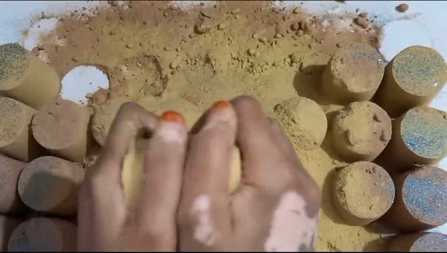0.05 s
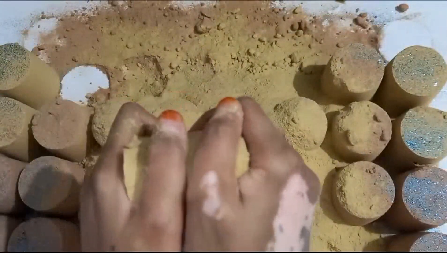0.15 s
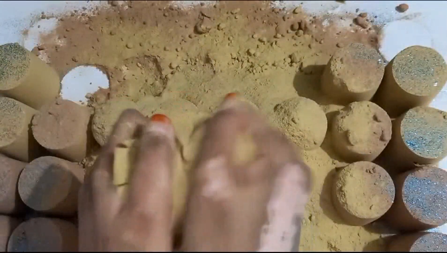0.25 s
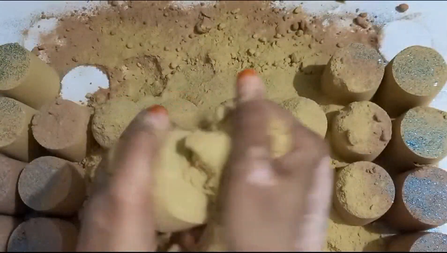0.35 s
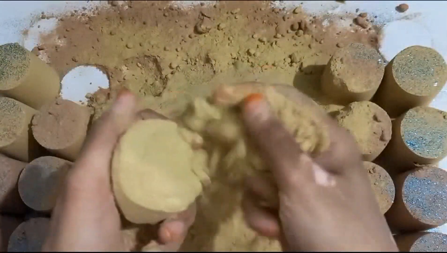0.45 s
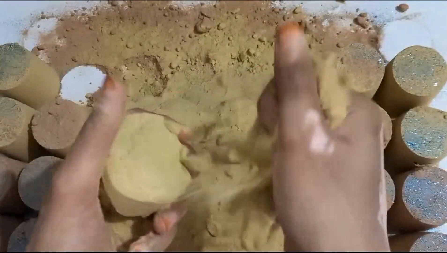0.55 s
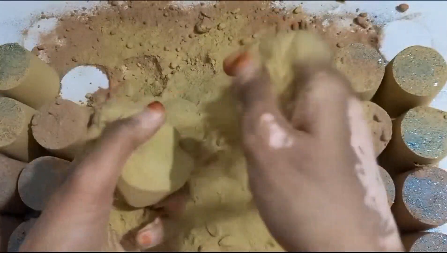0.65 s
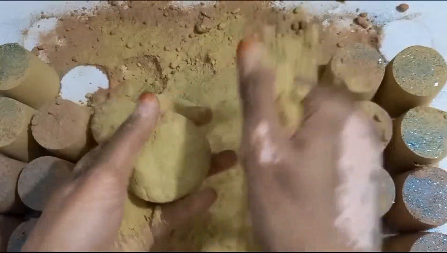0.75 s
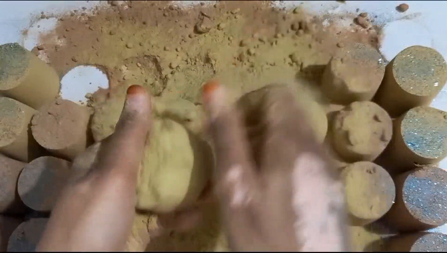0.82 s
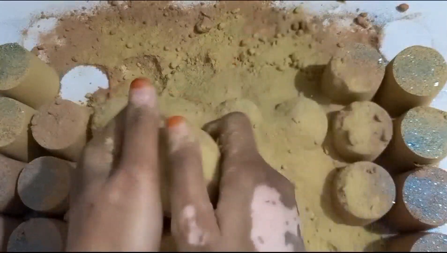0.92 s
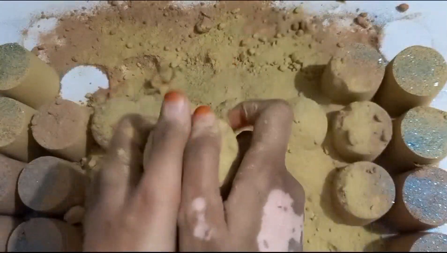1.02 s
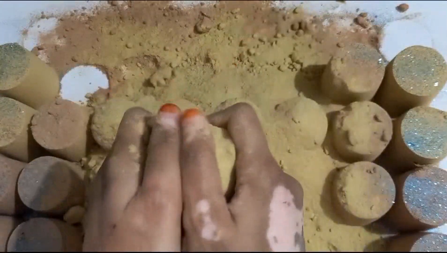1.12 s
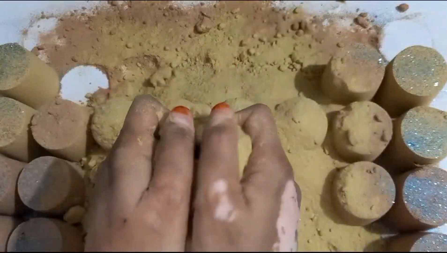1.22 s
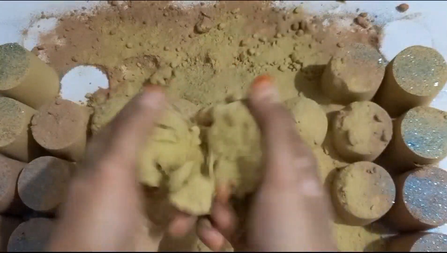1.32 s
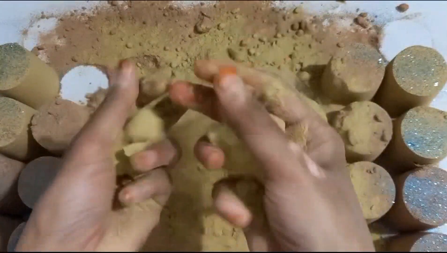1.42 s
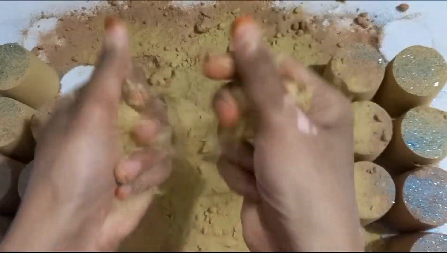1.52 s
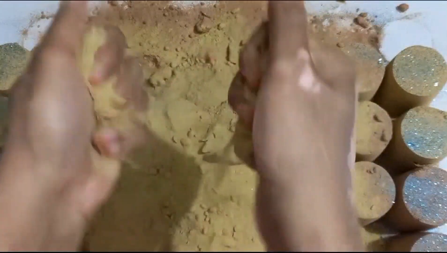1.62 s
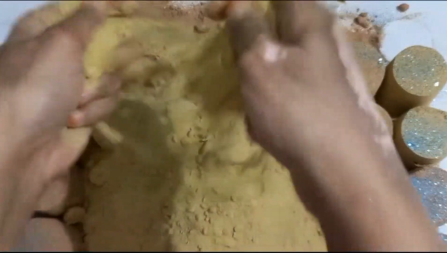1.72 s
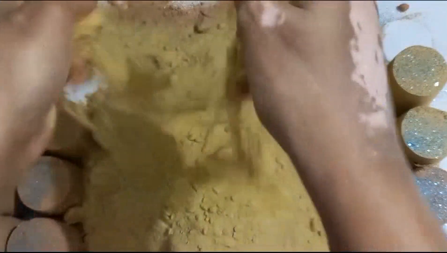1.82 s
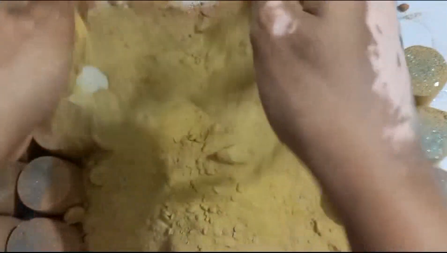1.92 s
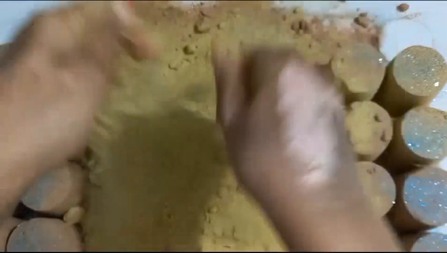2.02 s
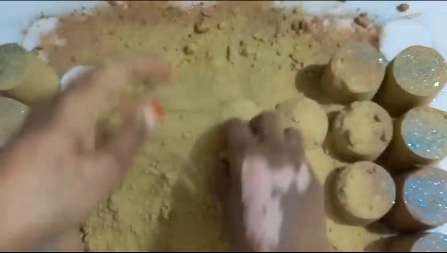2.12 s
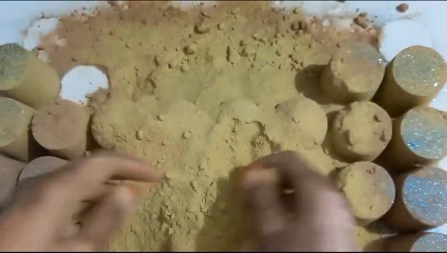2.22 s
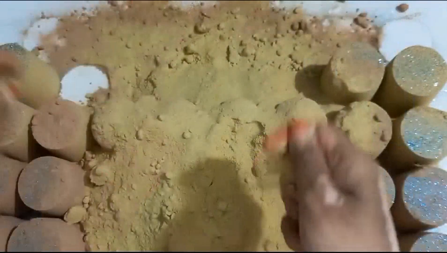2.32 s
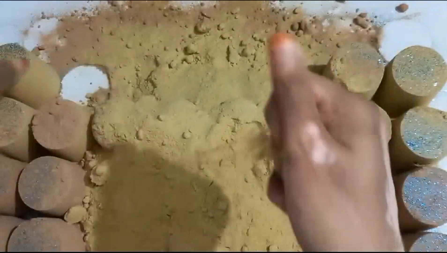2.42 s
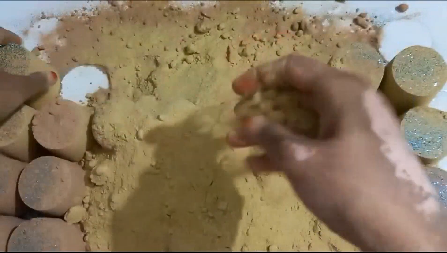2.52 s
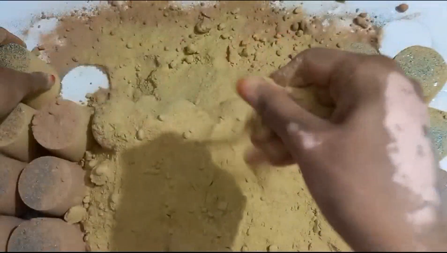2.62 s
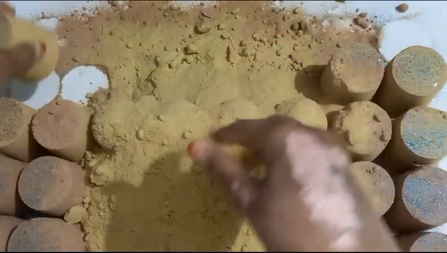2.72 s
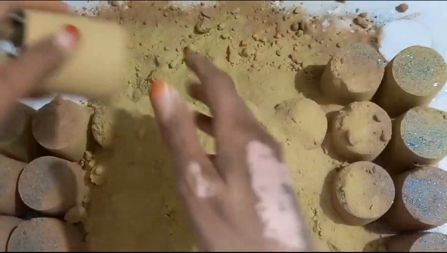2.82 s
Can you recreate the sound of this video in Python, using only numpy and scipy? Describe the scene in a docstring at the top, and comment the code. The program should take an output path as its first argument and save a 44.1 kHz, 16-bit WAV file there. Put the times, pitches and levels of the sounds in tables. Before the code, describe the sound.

Powder blocks crushed and crumbled by two hands, gritty crunching bursts with sharp crackles, close and dry

```python
"""A fine hiss of grains comes first: two hands close by squeeze and break pressed powder blocks.
Grains are clumped random impulses through band colours; low crumbs crunch and hard chips ring.
Blocks give way with dull thuds (damped modes) and short cracks (decaying noise); lumps scrape (narrow noise).
Handling rumbles softly below (low sine bumps and noise), with faint short tones, over a quiet room's noise."""
import sys
import numpy as np
from scipy import signal
from scipy.fft import rfft, irfft, next_fast_len
from scipy.io import wavfile
from scipy.ndimage import uniform_filter1d, map_coordinates

SR = 44100
rng = np.random.default_rng(int(sys.argv[2]) if len(sys.argv) > 2 else 0)


def inscribe(sig):
    """Save sig as 16-bit PCM at rate SR to the path in sys.argv[1].

    A 1-D sig is mono; a 2-D sig holds one channel per row.
    Samples are clipped to [-1, 1] before scaling.
    """
    pcm = np.round(np.clip(np.atleast_2d(sig).T, -1, 1) * 32767)
    wavfile.write(sys.argv[1], SR, pcm.astype(np.int16))


N = 127890
T = np.arange(N) / SR  # time [s]


def amp(db):
    """Decibel law: a level in dB as an amplitude ratio."""
    return 10 ** (np.asarray(db) / 20)


def unit(x):
    """Normalisation: x scaled to rms 1."""
    return x / np.sqrt(np.mean(x ** 2) + 1e-20)


def curves(rows):
    """Linear interpolation: one value per sample for each column after the time."""
    times, *columns = np.transpose(rows)
    return [np.interp(T, times, column) for column in columns]


def filtered(x, response):
    """Linear filtering: the spectrum of x times a response of frequency in Hz."""
    padded = next_fast_len(x.shape[-1] + 8192)
    spectrum = rfft(x, padded) * response(np.fft.rfftfreq(padded, 1 / SR))
    return irfft(spectrum, padded)[..., :x.shape[-1]]


def coloured(x, spectrum):
    """Spectral shaping: x through (frequency [Hz], level [dB]) points joined in log frequency, at rms 1."""
    points_hz, points_db = np.transpose(spectrum)

    def response(hz):
        return amp(np.interp(np.log(hz + 1), np.log(points_hz + 1), points_db, -120, -120))
    return unit(filtered(x, response))


def sides(pan_db):
    """Level panning: left and right gains that differ by pan_db."""
    return amp(np.array([pan_db / 2, -pan_db / 2]))


def wobble(rate):
    """Smooth random modulation: a spline through normal draws, rate knots a second."""
    return map_coordinates(rng.standard_normal(N // 20), [T * rate])


def pair(alike):
    """Partial coherence: two white noises with correlation alike."""
    a, b = rng.standard_normal((2, N))
    angle = np.arccos(np.clip(alike, -1, 1)) / 2
    shared, opposed = np.cos(angle) * a, np.sin(angle) * b
    return np.array([shared + opposed, shared - opposed])


def patchy(x, depth_db):
    """Time-frequency modulation: random patches of gain, the same on both sides, at rms 1."""
    frames = signal.stft(x, nperseg=512)[2]
    field = rng.standard_normal(frames.shape[1:])
    field = uniform_filter1d(field, size=2, axis=0)  # smooth over frequency
    field = uniform_filter1d(field, size=4, axis=1)  # smooth over time
    return unit(signal.istft(frames * amp(depth_db * unit(field)), nperseg=512)[1][:, :N])


def around(centre_hz, octaves, wide, count):
    """Band-limited noise: a stereo peak at a centre, plus a flat floor of gain wide, at rms 1."""
    def response(hz):
        peak = 1 / (1 + (np.log2((hz + 1) / centre_hz) / octaves) ** 4)
        return wide * (hz > 700) * (hz < 7300) + peak
    return unit(filtered(pair(0.47)[:, :count], response))


def add_at(out, start_s, sound):
    """Superposition: sound added into out from start_s on."""
    out[:, round(start_s * SR):][:, :sound.shape[1]] += sound


def grains(per_s, life_s, bed, clump_db, alike):
    """Shot noise: decaying impulses of scattered size gate noise, in clumps, on an even bed."""
    SIZE_DB = 1.5  # mean of the exponential spread of size in dB
    draw = rng.random((2, N))
    impulses = (draw[0] < per_s / SR) * amp(-SIZE_DB * np.log(draw[1] + 1e-4))
    bursts = signal.lfilter([1], [1, -np.exp(-1 / (life_s * SR))], impulses)
    return (unit(bursts) + bed) * amp(clump_db * wobble(60)) * pair(alike)


def chips():
    """Damped oscillation: hard little chips snap off and ring, each at its own pitch and place."""
    SLOTS_PER_S, CHIP_PER_S = 400, 380  # possible and mean actual chips a second
    CHIP_HZ, CHIP_OCTAVES = 2300, 0.5  # middle pitch and its standard deviation
    CHIP_CYCLES, CHIP_SIZE_DB = 9, 2.5  # decay by a factor e; mean of the exponential size spread
    t = T[:SR // 25]
    draw = rng.random((int(N / SR * SLOTS_PER_S), 6))
    spread = np.sqrt(12) * (draw[:, 1:2] + draw[:, 2:3] - 1) / np.sqrt(2)  # standard deviation 1
    hz = np.clip(CHIP_HZ * 2 ** (CHIP_OCTAVES * spread), 300, 6900)
    size = (draw[:, 3:4] < CHIP_PER_S / SLOTS_PER_S) * amp(-CHIP_SIZE_DB * np.log(draw[:, 4:5] + 1e-3))
    envelope = np.exp(-t * hz / CHIP_CYCLES) * (1 - np.exp(-t * hz / 2))
    ring = size * np.sin(2 * np.pi * hz * t) * envelope
    at = (draw[:, :1] * N).astype(int) + np.arange(len(t))
    angle = draw[:, 5:] * np.pi / 2  # equal-power place from left to right
    left, right = [np.bincount(at.ravel(), (ring * gain(angle)).ravel(), N)[:N] for gain in (np.cos, np.sin)]
    return unit(np.array([left, right]))


def powder():
    """Granular emission: grain noise swells and fades in several bands, from low crumbs to a thin top hiss."""
    # Level curve points: (time [s], fine grain level [dB], then over it crumbs [dB], grit [dB],
    # 8-14 kHz hiss [dB], top hiss [dB]; left minus right of all but the crumbs [dB])
    level_points = [(0.0, -48.5, -19.5, -9.5, -39, -16, 5), (0.07, -76.5, -13, -10, -23, -9, 1),
                    (0.12, -43, -9.5, -13, -34, -22.5, 1.5), (0.17, -51.5, -11, 1, -31, -21, 1),
                    (0.22, -60, -8, -7.5, -30, -12, 8), (0.25, -31.5, 3.5, 4, -15.5, -12, 0),
                    (0.28, -52.5, 5, -1.5, -22, -5, 4.5), (0.34, -52, -3.5, -4, -39, -19, 5.5),
                    (0.35, -56, 7.5, 3, -36, -18, -3), (0.41, -73, -2, -6, -20, 0, 4.5),
                    (0.45, -52.5, -2.5, -5, -32, -19, 1.5), (0.52, -37.5, -2, -9, -18.5, -12.5, 7),
                    (0.56, -43, -7.5, -4.5, -21, -4.5, 4), (0.6, -50, -3, -3.5, -29, -17, 0),
                    (0.63, -46, -15, -6, -32, -13, 1), (0.65, -49, -11, -5, -30, -16, 4),
                    (0.7, -37, -10, -7, -12.5, -13, -1), (0.77, -53.5, -6.5, -2.5, -26, -10, 5),
                    (0.8, -41.5, -15.5, -6.5, -36, -28, 2), (0.82, -49.5, 2, 1, -30, -18, 0),
                    (0.86, -54.5, -13.5, -13, -24, -19, 2), (0.9, -47, -13, 0.5, -24, -16, 3.5),
                    (0.97, -60.5, -14.5, -15.5, -33, -18.5, 5.5), (1.15, -72, -7.5, -9, -24, -3, 6.0),
                    (1.19, -45, -0.5, -1, -19, -17.5, 1), (1.25, -57, 1, -1, -37, -15.5, 3.5),
                    (1.34, -52, -22, -11, -31, -12.5, 5.5), (1.38, -68, -18, -7, -25, -16, 3),
                    (1.4, -53.5, -16, -9.5, -26, -12, 1), (1.478, -37.5, -5, 0, -18.5, -14, -2.5),
                    (1.49, -34, -6, 4, -29, -13, 4), (1.5, -41.5, 0.5, -4, -16, -13, 5),
                    (1.53, -35.5, 5.5, 0.5, -20, -4.5, 0.5), (1.57, -35.5, -9, -5, -21, -8, 3.5),
                    (1.62, -42.5, -1.5, 0, -18, -21, 3.5), (1.655, -47.5, -6, -6, -34, -13, -0.5),
                    (1.68, -57, -8.5, -9, -26, -9, 1), (1.715, -51.5, -5, 3, -30, -10, 1.5),
                    (1.74, -38, -11, -7.5, -15, -15, 3), (1.78, -38.5, -5, -5.5, -6, -4, 0),
                    (1.84, -49.5, -4.5, -6.5, -34, -14, 1), (1.93, -34.5, -10, -8, -12.5, -10.5, 2),
                    (2.0, -52, -6, -4, -18.5, -5, 3), (2.04, -43, -9.5, -11.5, -22, -7, 2.5),
                    (2.075, -73, 8, -2, -10, -2, 2), (2.12, -67.5, -3, -10, -28, -7, 5),
                    (2.22, -75.5, 11, 4, -16, -3, -1), (2.25, -51, -23, -46, -36, -16.5, 9),
                    (2.28, -63, 7.5, 5, -20, -15, -2), (2.3, -41.5, -4.5, -7.5, -26.5, -14, 1),
                    (2.41, -45, -10.5, -9, -18, -11.5, 5.5), (2.45, -60.5, -17, 0, -35, -11, 6.5),
                    (2.49, -78.5, -5, -8, -13, -4, -2.5), (2.54, -47, -27, -12, -35, -22.5, 3),
                    (2.58, -37.5, -22, -11.5, -20, -20, 3), (2.62, -37, -23, -9, -23.5, -12, 1.5),
                    (2.74, -79, -7, -6.5, -18, -7, 1), (2.85, -54, -18, -19, -37, -16, 3.5),
                    (2.87, -61, -17.5, -10.5, -34, -10, 5.5), (2.89, -46, -30, -14, -41, -20, 8),
                    (2.9, -44.5, -24, -7, -36, -21, 8)]
    # Spectra of each band: (frequency [Hz], density [dB per Hz])
    fine_colour = [(3600, -16.5), (4400, -10.5), (5200, -5), (6400, 0), (6900, -5), (7200, -13),
                   (8300, -32), (9000, -74)]
    grit_colour = [(2100, -49), (2700, -3), (4300, -1.5), (5200, -21)]
    high_hiss_colour = [(7400, -13), (8400, -10), (9400, -3), (13500, -6), (14500, -27)]
    top_colour = [(13400, -18), (14500, -5.5), (15100, 8), (15900, -8), (16300, -19)]
    crumb_colour = [(200, -15), (350, -4), (700, -8), (950, -2.5), (1190, 2), (1650, -5), (2100, 2),
                    (2600, -2.5), (3200, -46)]
    FINE_PER_S, CRUMB_PER_S = 5000, 3400  # grains a second
    CHIP_DB, CRUMB_PAN_DB = -8, 1  # chips over the crumbs; left minus right of both

    level_db, crumb_db, grit_db, high_hiss_db, top_db, pan_db = curves(level_points)
    mid_grains = grains(FINE_PER_S, life_s=0.00046, bed=1.1, clump_db=2.5, alike=0.44)
    high_grains = grains(FINE_PER_S, life_s=0.00044, bed=1.4, clump_db=0.5, alike=0.6)
    low_grains = grains(CRUMB_PER_S, life_s=0.0013, bed=4.1, clump_db=1.5, alike=0.22)

    upper = patchy(coloured(mid_grains, fine_colour), depth_db=3.5)
    upper += amp(grit_db) * patchy(coloured(mid_grains, grit_colour), depth_db=1.5)
    upper += amp(high_hiss_db) * patchy(coloured(high_grains, high_hiss_colour), depth_db=6.5)
    upper += amp(top_db) * patchy(coloured(high_grains, top_colour), depth_db=4.5)
    crumbs = patchy(coloured(low_grains, crumb_colour), depth_db=5.5)
    lower = (crumbs + amp(CHIP_DB) * chips()) * sides(CRUMB_PAN_DB)[:, None]
    return amp(level_db) * (upper * sides(pan_db) + amp(crumb_db) * lower)


def thuds():
    """Modal synthesis: a block gives way and rings low damped modes whose pitch sags at the start."""
    # Blocks giving way: (time [s], level before THUD_DB [dB], strongest pitch [Hz], left minus right [dB])
    breaks = [(0.2434, -10.5, 220, 0.5), (0.265, -29, 332, -1), (0.2541, -37.5, 324, -34),
              (0.35, -33, 372, -7.5), (0.521, -37.5, 221, 4.5), (0.611, -52, 180, 22),
              (0.821, -33, 324, -5.5), (1.1781, -16, 255, 0), (1.182, -34, 810, -5), (1.209, -33, 290, 6),
              (1.1865, -21, 348, 7), (1.271, -50, 330, 2), (1.5159, -26.5, 503, -15), (1.521, -22, 530, 2),
              (1.525, -31.5, 188, -6), (1.544, -49, 202, 3.5), (1.783, -48, 376, -15), (2.057, -38, 124, 7),
              (2.082, -46, 330, 1), (2.301, -48.5, 412, 18.5)]
    # Modes of a block: (frequency once settled [Hz], level at the strongest pitch [dB], 60 dB decay [s])
    modes = [(90.4, -24, 0.16), (105.3, -5, 0.11), (164.6, 14.5, 0.032), (226, 14.5, 0.022),
             (268.4, -11.5, 0.054), (315.7, 5.5, 0.036), (527, 6.5, 0.019), (610, 4.5, 0.03),
             (863, -21, 0.1)]
    OFF_PITCH_DB = 9.5  # loss per octave from the strongest pitch
    THUD_DB, THUD_RISE_S = 4, 0.0046
    SAG, SAG_S = 0.39, 0.0045  # the modes start this share sharp and settle with this time constant
    out, t = np.zeros((2, N + SR)), T[:SR // 4]
    bent = t + SAG * SAG_S * (1 - np.exp(-t / SAG_S))  # warped time bends every mode alike
    rise = (1 - np.exp(-t / THUD_RISE_S)) ** 2
    for start_s, db, pitch_hz, pan_db in breaks:
        ring = np.zeros(len(t))
        for hz, mode_db, t60 in modes:
            decay_db = mode_db - OFF_PITCH_DB * abs(np.log2(hz / pitch_hz)) - 60 * t / t60
            ring += amp(decay_db) * np.sin(2 * np.pi * hz * bent)
        # each mode swings negative first
        add_at(out, start_s, -sides(pan_db)[:, None] * amp(db + THUD_DB) * ring * rise)
    return out[:, :N]


def cracks():
    """Fracture noise: short, exponentially decaying bursts around a centre as lumps split."""
    # Splits: (time [s], level before CRACK_DB [dB], centre [Hz])
    splits = [(0.115, -24, 2470), (0.138, -22, 3280), (0.242, -17, 2300), (0.247, -16.5, 840),
              (0.481, -18.5, 2240), (0.522, -18, 3960), (0.824, -28, 1380), (1.177, -20, 750),
              (1.205, -27.5, 3020), (1.483, -10.5, 2030), (1.523, -9.5, 1230), (2.037, -28, 2570),
              (2.293, -16.5, 2150), (2.301, -17.5, 2070), (2.38, -19.5, 4400)]
    CRACK_OCTAVES, CRACK_WIDE = 0.39, 0.14  # half width at half gain; gain of the flat floor
    CRACK_RISE_S, CRACK_T60_S = 0.0008, 0.066
    CRACK_DB, CRACK_PAN_DB = -18, 1.5
    out, t = np.zeros((2, N + SR)), T[:SR // 10]
    rise = 1 - np.exp(-t / CRACK_RISE_S)
    for start_s, db, centre_hz in splits:
        burst = around(centre_hz, CRACK_OCTAVES, CRACK_WIDE, count=len(t))
        decay = amp(db + CRACK_DB - 60 * t / CRACK_T60_S)
        add_at(out, start_s, sides(CRACK_PAN_DB)[:, None] * decay * burst * rise)
    return out[:, :N]


def scrapes():
    """Friction noise: lumps slide over skin and powder, each with one narrow colour."""
    # Slides: (time [s], length [s], centre [Hz], level before the swell [dB], half width [octaves])
    slides = [(0.359, 0.026, 490, -53, 0.28), (0.476, 0.022, 1420, -44, 0.088),
              (0.5, 0.043, 1200, -46, 0.2), (0.682, .1, 610, -62, .25), (0.744, 0.12, 356, -57, 0.46),
              (0.976, 0.027, 830, -65, .25), (1.201, 0.019, 1926, -51, .05),
              (1.216, 0.022, 2090, -48.5, 0.038), (1.28, 0.061, 3080, -59, 0.082),
              (1.585, 0.086, 1120, -59.5, 0.15), (1.736, 0.05, 1340, -44, 0.31),
              (1.845, 0.038, 624, -56, 0.24), (1.848, 0.033, 2360, -52, 0.13),
              (1.922, 0.028, 2350, -41, 0.2), (1.974, 0.024, 1080, -56.5, .25),
              (2.369, 0.032, 1930, -48.5, 0.34), (2.599, 0.036, 2300, -44.5, 0.15),
              (2.665, 0.029, 2540, -55, .2), (2.819, 0.057, 4390, -51, 0.032),
              (2.825, 0.033, 3850, -56, 0.068), (2.884, 0.032, 4120, -38.5, 0.22)]
    out, t = np.zeros((2, N + SR)), T[:SR // 5]
    for start_s, length_s, centre_hz, db, octaves in slides:
        swell = np.sin(np.pi * np.clip(t / length_s, 0, 1)) ** 0.4  # a small power: abrupt start and end
        add_at(out, start_s, amp(db) * around(centre_hz, octaves, 0, count=len(t)) * swell)
    return out[:, :N]


def rumble():
    """Low-frequency pulses: soft low bumps, each with a randomly drawn left-right balance, on a faint wash."""
    # Handling bumps: (time of the middle [s], level before panning [dB], frequency [Hz],
    # length between the -20 dB points [s])
    handling = [(0.141, -45.5, 95, 0.027), (0.373, -51, 115, 0.058), (0.423, -48.5, 85, 0.063),
                (0.603, -48, 95, 0.089), (0.65, -52, 85, 0.089), (0.744, -52.5, 85, 0.15),
                (0.832, -38, 100, 0.022), (1.542, -41.5, 88, 0.075), (1.627, -45, 88, 0.068),
                (1.73, -52, 85, 0.041), (2.059, -43, 95, 0.051), (2.333, -50, 85, 0.029),
                (2.448, -47.5, 90, 0.052), (2.701, -56, 95, 0.12), (2.752, -43, 90, 0.047),
                (2.804, -54, 95, 0.071)]
    # Spectrum of the wash: (frequency [Hz], density [dB per Hz])
    low_colour = [(15, -63), (25, -7), (55, 1), (85, -7), (103, -1), (124, -4), (220, -20), (290, -28.5),
                  (480, -120)]
    BUMP_PAN_DB = 6  # standard deviation of left minus right
    RUMBLE_DB, RUMBLE_SWING_DB = -64, 3  # middle level of the wash and its swing
    bumps = np.zeros((2, N))
    for middle_s, db, hz, length_s in handling:
        cycles = hz * T + rng.random() + rng.normal(0, 0.12, (2, 1))  # phase differs a little per side
        bell = np.exp(-(3.04 * (T - middle_s) / length_s) ** 2)
        gains = sides(rng.normal(0, BUMP_PAN_DB))[:, None]
        bumps += amp(db) * np.sin(2 * np.pi * cycles) * bell * gains
    wash = coloured(pair(0.65), low_colour)
    return bumps + amp(RUMBLE_DB + RUMBLE_SWING_DB * wobble(6.4)) * wash


def whistles():
    """Amplitude and phase modulation: faint short tones turn breathy as both wander."""
    # Tones: (time [s], length [s], frequency [Hz], middle level [dB])
    tones = [(.045, .06, 1420, -66), (2.06, .095, 1055, -61), (0, .055, 510, -67), (2.154, .018, 1230, -57),
             (2.165, .033, 1275, -63)]
    out = np.zeros(N)
    for start_s, length_s, hz, db in tones:
        level = amp(db + 1.5 * wobble(50))
        tone = np.sin(2 * np.pi * hz * T + 0.35 * wobble(50))
        out += level * tone * np.sin(np.pi * np.clip((T - start_s) / length_s, 0, 1)) ** 0.5
    return out


def room():
    """Stationary noise: a quiet, steady room tone, only slightly alike on the two sides."""
    # Spectrum of the room: (frequency [Hz], density [dB per Hz])
    room_colour = [(88, -58), (150, -3), (735, -15.5), (1460, -25), (2160, -28), (4550, -33), (6110, -12),
                   (8370, -63), (13900, -31), (15100, -35), (16300, -35)]
    return amp(-69.5) * coloured(pair(0.21), room_colour)


def scene():
    """Superposition: all sources add, from the powder to the room."""
    return powder() + thuds() + cracks() + scrapes() + rumble() + whistles() + room()


def record(dry):
    """Frequency response: the left port leads in phase, deep bass is thinned and the band ends sharply."""
    # Phase lead of left over right: (frequency [Hz], lead [radians])
    left_leads = [(0, 0), (2150, 1.1), (2670, 1.4), (4740, 4.4), (6370, 6.2), (9000, 6.3), (16000, 6.6)]
    MIC_LOW_HZ, TOP_HZ = 55.6, 15960  # frequency of half gain in the bass; band limit

    def response(hz):
        lead = np.interp(hz, *np.transpose(left_leads))
        phase = np.exp(0.5j * lead * np.array([[1], [-1]]))  # half the lead on each side
        bass_cut = hz ** 2 / (hz ** 2 + MIC_LOW_HZ ** 2)
        return phase * bass_cut * (hz < TOP_HZ)
    return filtered(dry, response)


dry = scene()
out = record(dry)
inscribe(out)
```